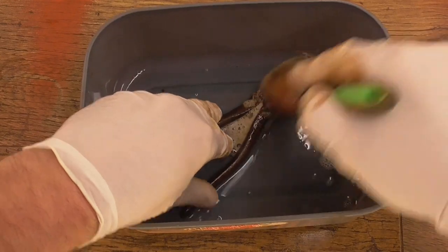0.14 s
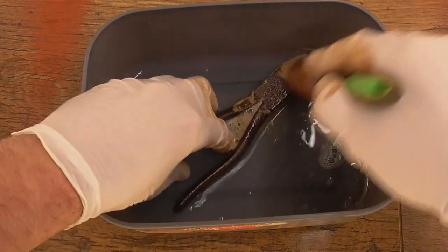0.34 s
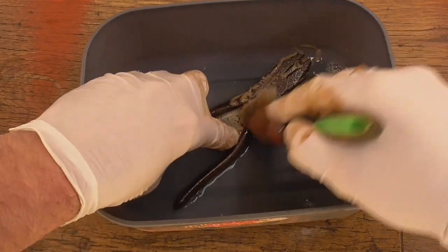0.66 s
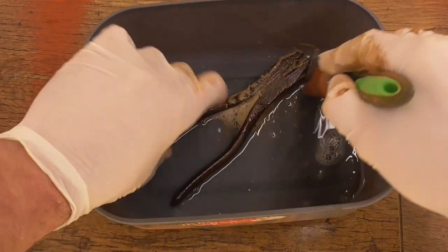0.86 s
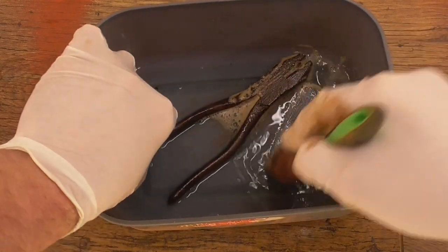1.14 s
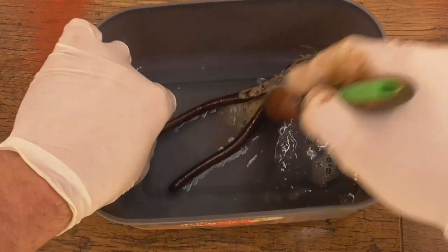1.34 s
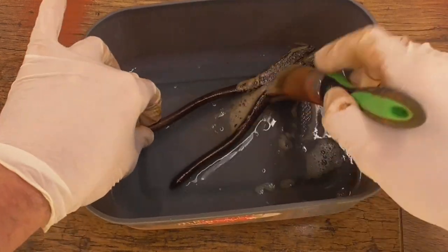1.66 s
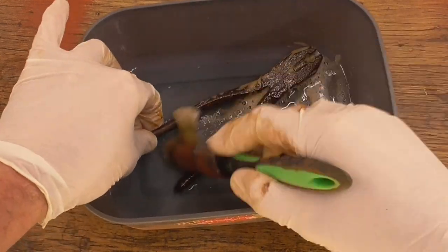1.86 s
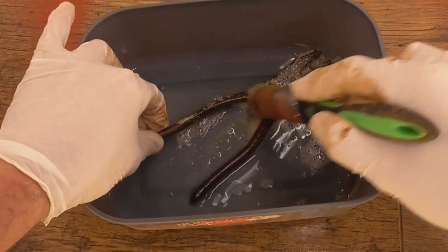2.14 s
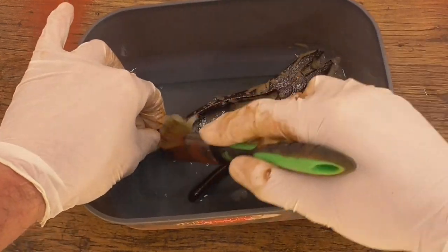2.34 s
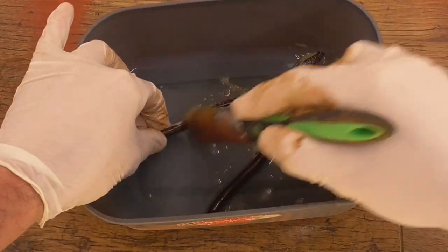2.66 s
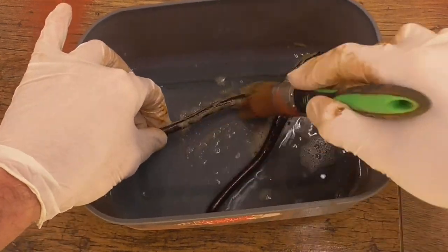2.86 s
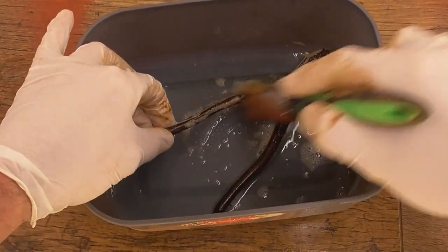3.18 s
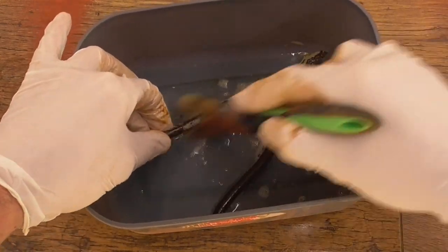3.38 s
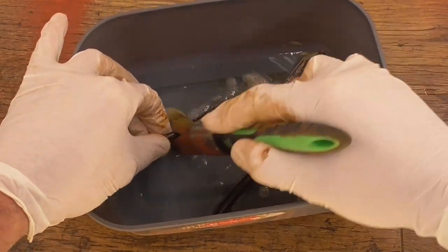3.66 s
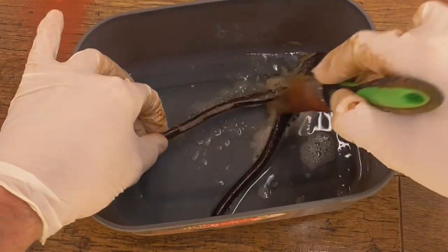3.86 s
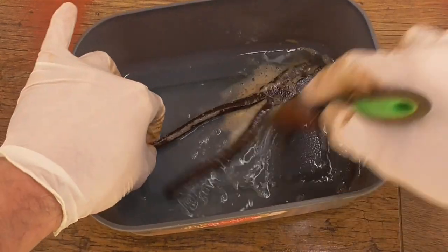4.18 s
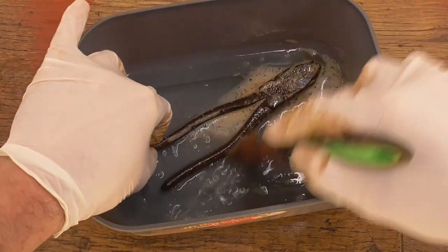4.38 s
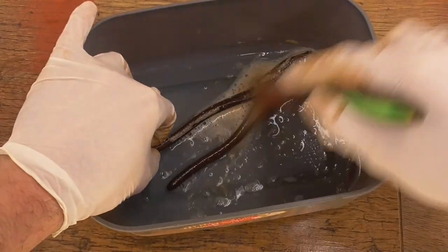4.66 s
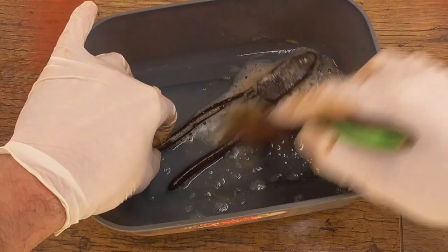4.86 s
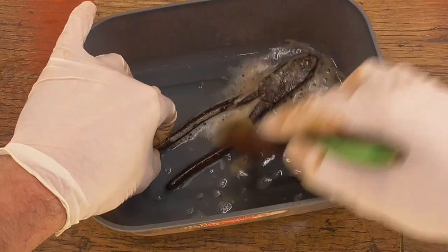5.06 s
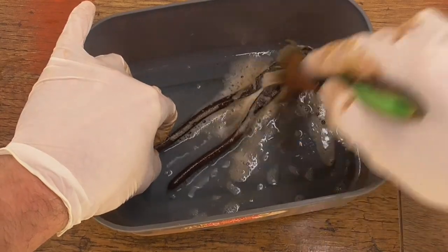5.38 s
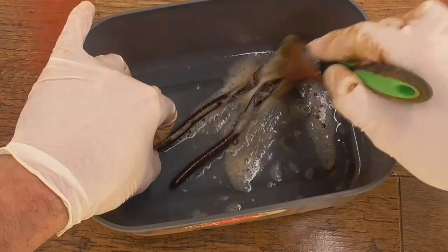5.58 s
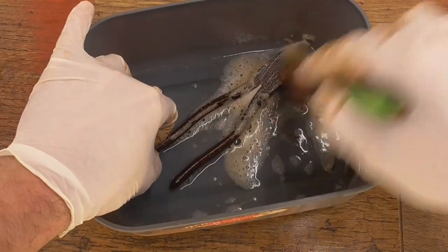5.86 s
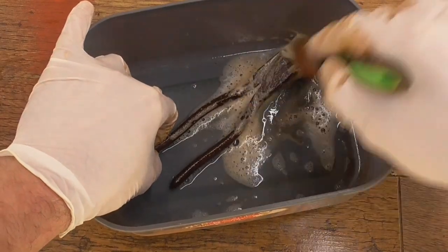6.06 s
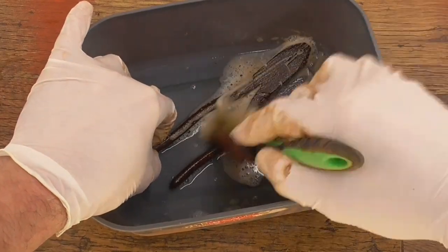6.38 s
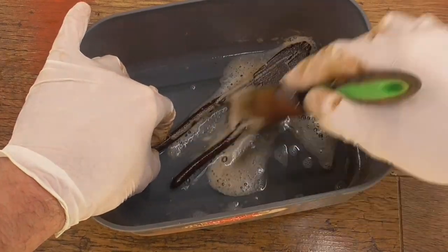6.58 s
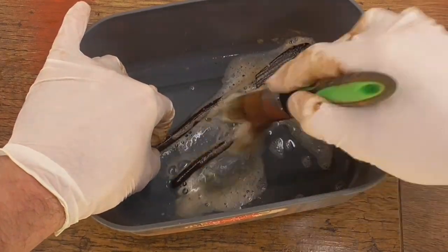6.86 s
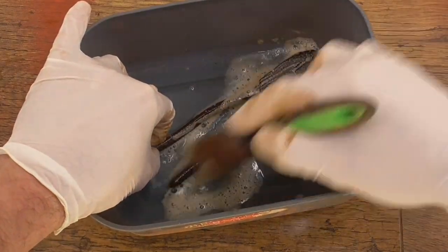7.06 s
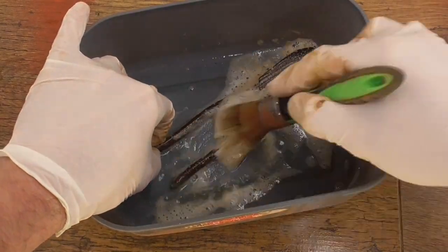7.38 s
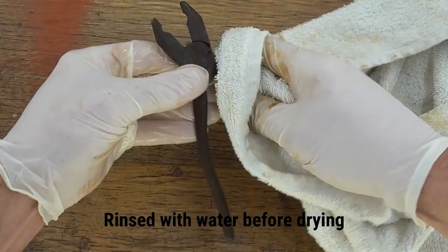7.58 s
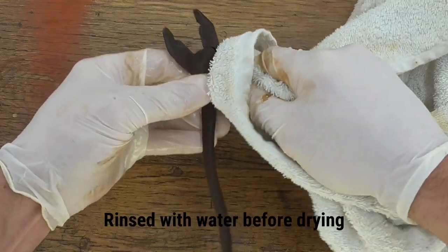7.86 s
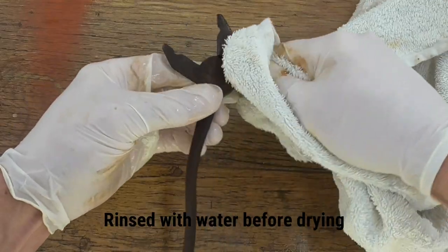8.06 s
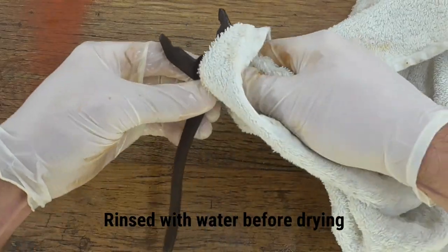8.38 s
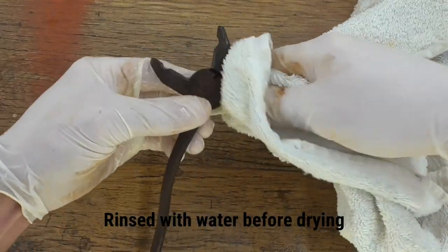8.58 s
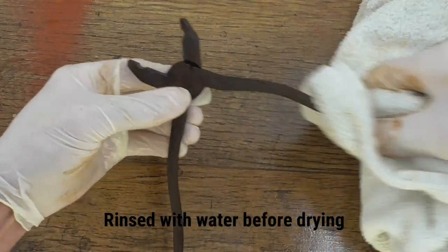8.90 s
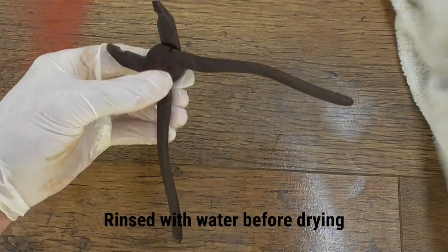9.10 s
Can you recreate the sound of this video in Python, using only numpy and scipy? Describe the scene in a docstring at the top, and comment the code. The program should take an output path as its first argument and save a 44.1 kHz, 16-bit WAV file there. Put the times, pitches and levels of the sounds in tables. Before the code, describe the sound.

Wet, scratchy brush strokes come about eight a second on steel and plastic, with brief lulls early on, then a denser, louder run. Liquid laps, small bubbles plip, and the tub answers irregular bumps with short boxy thumps. Near the end the sound cuts to much softer cloth sliding over metal, with small clicks. A close stereo pair in a small room picks up low rumble and very faint hum.

```python
"""A small stiff brush scrubs rusty pliers in a shallow film of liquid, in a plastic tub on a wooden top.
Each stroke is a swarm of random bristle flicks: wet hiss and spray, a rasp on the steel, a scrape through the tub.
The pliers knock on the tub floor, built from decaying modes and noise bursts; liquid laps and small bubbles ring.
Then the scene changes abruptly: a towel of sliding noise rubs the pliers dry, with small clicks of the steel.
A small room answers both scenes, over low rumble and faint hum, before a close left and right microphone pair."""
import sys
import numpy as np
from scipy import signal
from scipy.fft import rfft, irfft, next_fast_len
from scipy.io import wavfile

SR = 44100
rng = np.random.default_rng(int(sys.argv[2]) if len(sys.argv) > 2 else 0)


def persist_wave(psi):
    """Save psi, clipped to +-1, as 16-bit WAV."""
    counts = np.round(np.clip(psi, -1, 1) * 32767).astype(np.int16)
    wavfile.write(sys.argv[1], SR, np.atleast_2d(counts).T)


N = 407027
TIME = np.arange(N) / SR

# brush strokes, to and fro: fastest_s, length_s, wet_hiss_db
STROKES = [(0.013, 0.037, -62), (0.093, 0.083, -61), (0.199, 0.08, -56.5), (0.297, 0.096, -59),
           (0.413, 0.06, -51), (0.52, 0.13, -60.5), (0.635, 0.1, -57), (0.743, .07, -59.5),
           (0.868, 0.11, -55.5), (1.065, 0.046, -68), (1.194, 0.29, -71), (1.45, .015, -64.5),
           (1.477, 0.047, -65), (1.564, 0.12, -61), (1.727, 0.14, -60.5), (1.958, 0.16, -60.5),
           (2.164, 0.14, -60), (2.309, .04, -62.5), (2.435, 0.11, -65.5), (2.586, 0.098, -54),
           (2.726, 0.044, -69.5), (2.834, 0.045, -64.5), (2.928, 0.085, -52), (3.076, 0.13, -64),
           (3.201, 0.074, -54.5), (3.361, 0.16, -56.5), (3.547, 0.094, -48.5), (3.722, 0.095, -52.5),
           (3.882, 0.092, -48), (3.99, 0.13, -65.5), (4.127, 0.027, -64), (4.227, 0.13, -64),
           (4.323, 0.072, -53.5), (4.452, 0.11, -60.5), (4.561, 0.064, -52), (4.685, 0.12, -58.5),
           (4.803, 0.061, -52.5), (4.91, 0.059, -55.5), (5.023, 0.095, -55.5), (5.139, 0.056, -51.5),
           (5.241, 0.075, -53.5), (5.354, 0.07, -55.5), (5.455, 0.063, -53.5), (5.564, 0.11, -58.5),
           (5.694, 0.096, -55), (5.809, 0.077, -57.5), (5.92, .065, -53), (6.021, 0.11, -59),
           (6.144, 0.07, -54), (6.234, 0.086, -59.5), (6.363, 0.077, -55.5), (6.433, .05, -60),
           (6.499, 0.091, -57.5), (6.708, 0.086, -59), (6.793, 0.048, -61.5), (6.843, 0.08, -52),
           (6.972, 0.036, -52.5), (7.082, 0.084, -53), (7.222, 0.069, -56), (7.339, .08, -53.5),
           (7.47, 0.069, -55.5), (7.607, 0.076, -57)]
# colour of bristles or cloth rasping on steel: frequency_hz, level_db_per_hz
RASP = [(1300, -13.5), (2000, -5), (2900, -3.5), (3600, 4), (4300, 2), (5000, -1.5), (5800, -11.5),
        (8000, -32)]
# colour of the scrape through the tub, also of rustling cloth folds: frequency_hz, level_db_per_hz
SCRAPE = [(150, -38), (380, 4.5), (520, -1.5), (680, 9.5), (1000, 4.5), (1400, 6.5), (1850, -6.5),
          (2300, -4), (2900, -18.5), (4500, -23)]
# colour of a small steel click: frequency_hz, level_db_per_hz
CLICK = [(900, -10), (1500, 8), (2000, -16), (3000, 1), (4500, 2), (6500, -5.5), (14000, -16)]

SCRAPE_LAG_S = 0.011  # the drag on the tub follows the first hiss of the tips


def brush():
    """Bristles flick through the wet film and over the rust; their tugs on the pliers sound through the tub."""
    # colour of the wet hiss: frequency_hz, level_db_per_hz
    hiss_colour = [(900, -15), (1500, -7.5), (2150, -5.5), (2900, -13.5), (5500, -6.5), (7000, -2),
                   (8500, -1.5), (10300, 1.5), (12000, -7), (13500, -11), (15700, -31)]
    # colour of the spray: frequency_hz, level_db_per_hz
    mist_colour = [(8000, -28), (11000, -2), (12700, -2.5), (14000, -7), (15700, -14.5)]
    # fine spray from the tips, weaker once the brush works on the handle: time_s, level_db (before lift and speed)
    spray_curve = [(0, -5.5), (2.2, -6.5), (3.6, -8), (4.5, -7), (5.8, -8), (6.7, -9), (7.6, -11)]
    rise_share = 0.54  # part of a stroke spent speeding up
    rasp_lag_s = 0.0042  # the tips hiss first, then the bent bristles rasp and drag
    spray_lift_db = 8

    times, lengths, hiss_db = np.transpose(STROKES)
    rasp_db, scrape_db = stroke_levels()
    hiss = swell(times, lengths, hiss_db, rise_share)
    rasp = swell(times + rasp_lag_s, lengths, rasp_db, rise_share)
    scrape = swell(times + SCRAPE_LAG_S, 1.17 * lengths, scrape_db, rise_share)
    snags = catches(rate=90, t60=0.037)

    speed = hiss / hiss.max()
    spray_db = np.interp(TIME, *np.transpose(spray_curve)) + spray_lift_db
    spray = undb(spray_db) * speed ** 0.22  # fast strokes throw the finest drops
    film = undb(0.1) * colour(flicks(22000, 0.79), hiss_colour)
    film = film + spray * colour(flicks(16000, 1.0), mist_colour)

    wet = hiss * unit(1 + 0.5 * snags) * film
    steel = rasp * unit(1 + 0.087 * snags) * colour(flicks(8000, 0.47), RASP)
    tub = scrape * unit(1 + 0.5 * snags) * colour(flicks(3000, 1.0), SCRAPE)
    return wet + steel + tub


def stroke_levels():
    """Rasp and scrape of each stroke in dB: both grow with its vigour and with the pressure on the brush."""
    # how hard the brush bears down on pliers and tub: time_s, pressure_db
    pressure_curve = [(0, 3.5), (0.42, -6), (0.62, -0.5), (1.2, -1), (1.7, 4), (1.97, -5), (2.4, -10.5),
                      (2.62, 1), (3.1, -3.5), (3.55, -3), (3.9, -2), (4.5, -7), (4.8, 0.5), (5.15, 2),
                      (6.05, -2), (6.5, 1.5), (6.85, 4.5), (7.6, 3.5)]
    usual_hiss_db = -54.5  # an average stroke
    times, _, hiss_db = np.transpose(STROKES)
    vigour = hiss_db - usual_hiss_db
    pressure = np.interp(times, *np.transpose(pressure_curve))
    rasp_db = -57 + vigour + 0.63 * pressure
    scrape_db = -57 + 0.68 * vigour + pressure  # grows more slowly than the hiss
    return rasp_db, scrape_db


def swell(times, lengths, levels, rise_share):
    """Level curve of strokes that speed up, hold and slow down again."""
    steepness = 5.4  # how quickly the sound dies as the hand turns round
    flatness = 2.29  # how level it holds before
    coarse = TIME[::32]
    lag = coarse - times[:, None]
    reach = lengths[:, None] * np.where(lag < 0, rise_share, 1 - rise_share)
    away = np.abs(lag / reach)
    slowing = (1 + away ** flatness) ** (1 / flatness) - 1
    power = undb(levels)[:, None] ** 2 * np.exp(-steepness * slowing)
    return np.interp(TIME, coarse, np.sqrt(power.sum(0)))


def catches(rate, t60):
    """Tufts snag at random and spring free: sudden jumps of level that die away."""
    jumps = (rng.random(N) < rate / SR) * rng.standard_exponential(N)
    pole = np.exp(-np.log(1000) / (t60 * SR))
    return signal.lfilter([1], [1, -pole], np.minimum(jumps, 2))


def flicks(rate, spread_db):
    """Random tiny clicks, so many a second, a few much larger than the rest."""
    happens = rng.random(N) < rate / SR
    size = undb(spread_db * np.minimum(rng.standard_exponential(N), 5))
    return happens * size * rng.standard_normal((2, N))


def knocks():
    """The clear knocks, and faint ones where a stroke happens to nudge the pliers; stronger blows thud more."""
    # pliers and brush head knocking on the tub: start_s, knock_gain_db, floor_boom_gain_db, hard_clack_gain_db
    clear_knocks = [(0.1619, -47.5, 16.5, -5), (0.3188, -56.5, 11.5, 0), (0.451, -63, 21.5, -1),
                    (0.505, -60.5, 18.5, -14), (0.528, -50, 6, 1), (0.62, -60, 13, 11),
                    (0.895, -57.5, 11.5, -12), (0.926, -55.5, -14, -17), (1.1783, -54.5, -2, -2.5),
                    (1.472, -60.5, 13, 5), (1.5434, -50.5, -3, 1.5), (1.7431, -36.5, 5, -21),
                    (2.185, -48.5, -15, -4), (2.2606, -64, 13, -15), (2.6182, -56, 5, 8.5),
                    (2.6447, -52.5, -8, 0), (2.6913, -52, -10, 0.5), (2.976, -47, 7.5, 1),
                    (3.599, -57, -1, 7.5), (4.031, -54, 13, 0), (4.123, -47, 0, -1), (4.146, -47.5, 9, -15),
                    (4.269, -54, 13.5, 5), (4.3301, -47.5, -5, -1), (4.778, -59, -4, 12),
                    (4.7965, -45, 7.5, 0), (5.0255, -32.5, 4, -9), (5.286, -42, 4.5, -4),
                    (5.305, -42.5, 7.5, -25), (5.357, -49.5, -17, -7), (5.431, -58, 1, 6),
                    (5.488, -59.5, 11, 3), (5.5611, -51.5, 4, -5), (5.707, -30, 3, -9),
                    (5.732, -43.5, -17, 1.5), (5.8645, -49.5, 14, -7), (6.372, -58, 12, -17),
                    (6.6857, -47, 8.5, -9), (6.9607, -47.5, -5, -20), (6.983, -49, 6, 7),
                    (6.9965, -38, 6, -6), (7.245, -39.5, 5.5, 6.5), (7.4886, -41.5, 9, 9)]
    nudge_share, nudge_db, nudge_scatter_db = 0.2, -6, 3  # share of strokes; gain relative to their scrape
    firm_knock_db, firm_thud_db, thud_growth = -35, -67.5, 0.19  # wooden top, and dB per dB of the knock
    rocking_start_s, rocking_end_s, rocking_thud_db = 4.1, 5.6, 7  # here the whole tub rocks and thuds more
    thud_per_clack = 0.35  # dB less thud per dB of clack: sharp contacts hardly move the whole tub

    nudges = []
    for (s, length, _), scrape_db in zip(STROKES, stroke_levels()[1]):
        late, size, boom = rng.standard_normal(3)
        if rng.random() < nudge_share:
            nudge_gain_db = scrape_db + nudge_db + nudge_scatter_db * size
            nudges.append((s + length * late / 4, nudge_gain_db, 5 + 3 * boom, 0))

    out = np.zeros((2, N))
    for s, db, boom_db, clack_db in list(clear_knocks) + nudges:
        rocking = rocking_start_s < s < rocking_end_s
        thud_db = firm_thud_db + thud_growth * (db - firm_knock_db)
        thud_db += rocking_thud_db * rocking - thud_per_clack * max(clack_db, 0)
        add(out, s, knock(db, boom_db, clack_db, thud_db))
    return out


def knock(db, boom_db, clack_db, thud_db):
    """A blow rings walls and floor of the tub and thuds into the wood; hard contacts add a clack."""
    # tub modes, wet floor first, then walls, then those only a hard contact reaches: frequency_hz, level_db, t60_s
    tub_modes = np.array([(213.7, -5.5, 0.05), (291, 0, 0.062), (312.7, -1, 0.074), (395, -2, 0.048),
                          (400.7, -3, 0.15), (444, -7.5, 0.15), (542.4, -7, 0.14), (600.2, -1, 0.22),
                          (650, 4, 0.099), (709, -3, 0.13), (797, -6.5, 0.17), (895, -8.5, 0.098),
                          (933, -3.5, 0.41), (1017, 4, 0.3), (1040, -13, 0.055), (1226, 9.5, 0.051),
                          (1370, -16, 0.033), (1460, -23, 0.098), (1630, -6, 0.21)])
    # modes of the wooden top: frequency_hz, level_db, t60_s
    top_modes = [(64.7, 17.5, 0.35), (83.6, -13, 0.23), (92.4, 8, 0.93)]
    # colour of the dull thump in the tub: frequency_hz, level_db_per_hz
    thump_colour = [(50, -30), (130, -56), (190, 3.5), (240, 2), (330, -27), (420, 10.5), (530, -3.5),
                    (700, -2.5), (900, -0.5), (1400, -21), (2500, -44)]
    # colour of the crack of a hard contact: frequency_hz, level_db_per_hz
    crack_colour = [(500, -14), (1000, -3.5), (1500, -5), (1850, -16.5), (2400, -11.5), (2900, -22),
                    (4300, -17), (5500, -36), (10000, -29), (15000, -60)]

    t = TIME[:SR // 3]
    floor = ring(tub_modes[:4], detune=0.032, bloom_s=0.0062, width=0.054)
    walls = ring(tub_modes[4:12], detune=0.0078, bloom_s=0.0035, width=0.11)
    clack = ring(tub_modes[12:], detune=0.013, bloom_s=0.00049, width=0.14)
    thud = ring(top_modes, detune=0.03, bloom_s=0.0034, width=0.072)

    # the tub floor bows under the pliers and swings back
    swing = np.zeros(len(t))
    for hz in (303, 636):
        swing += np.sin(2 * np.pi * hz * (1 + 0.041 * rng.standard_normal()) * t)
    bow = blow(swing[None] * decay(t, 0.031) * (1 - np.exp(-t / 0.0047)))
    softness = 1 / (1 + undb(clack_db))

    body = undb(-3) * walls + undb(-10.5) * burst(thump_colour, t60=0.16)
    body = body + softness * undb(-6) * bow
    contact = undb(-10) * clack + undb(-6.5) * burst(crack_colour, t60=0.18)
    contact = contact + undb(-25.5) * burst(CLICK, t60=0.018)
    tub = body + undb(boom_db - 13.5) * floor + undb(clack_db) * contact
    # the first swings are the strongest, before liquid and pliers damp the plastic
    punch = 0.61 + 0.77 * np.exp(-t / 0.0072)
    return undb(db) * punch * tub + undb(thud_db) * thud


def ring(modes, detune, bloom_s, width):
    """Decaying modes; the place of each blow changes their strength and sign; bending waves take time to spread."""
    t = TIME[:SR // 3]
    hz, db, t60 = np.transpose(modes)[:, :, None]
    size, shift, sign, place = rng.standard_normal((4, len(modes), 1))
    waves = np.sin(2 * np.pi * hz * (1 + detune * shift) * t) * decay(t, t60)
    waves = waves * np.sign(sign) * undb(db + 1.35 * size)
    mid = waves.sum(0)
    side = width * (place * waves).sum(0)
    bloom = 1 - np.exp(-t / bloom_s)
    return blow(np.array([mid + side, mid - side]) * bloom)


def burst(points, t60):
    """A dense mass of short-lived resonances, made as decaying coloured noise."""
    t = TIME[:SR // 3]
    noise = rng.standard_normal((2, len(t)))
    return blow(colour(noise, points) * decay(t, t60))


def liquid():
    """The stirred liquid laps in the tub as slowly wavering coloured clicks, and bubbles ring in it."""
    # colour of the lapping: frequency_hz, level_db_per_hz
    slosh_colour = [(35, -16), (65, -4), (125, -14.5), (230, -10), (400, 0), (520, -3), (720, -0.5),
                    (1200, -12.5), (2000, -24), (5000, -30.5)]
    laps = colour(flicks(1500, 1.3), slosh_colour)
    return undb(-64.5 + 3.0 * walk(22)) * laps + bubbles(count=5)


def bubbles(count):
    """Each stroke whips up a few bubbles that ring briefly and rise in pitch."""
    middle_hz, spread_octaves = 1180, 0.55
    fade_cycles, glide = 4.9, 0.022  # cycles to fade to 1/e; share of pitch gained in that time
    level_db, scatter_db = -2.5, 2.5  # relative to the scrape of the stroke
    out, t = np.zeros((2, N)), TIME[:SR // 20]
    for (s, length, _), scrape_db in zip(STROKES, stroke_levels()[1]):
        for late, size, strength, place in np.clip(rng.standard_normal((count, 4)), -2, 2):
            cycles = middle_hz * 2 ** (spread_octaves * size) * t
            age = cycles / fade_cycles
            plip = np.sin(2 * np.pi * cycles * (1 + glide * age / 2)) * np.exp(-age)
            pan_db = np.array([[place], [-place]])
            db = scrape_db + level_db + scatter_db * strength + pan_db
            add(out, s + SCRAPE_LAG_S + late * length / 2, undb(db) * plip)
    return out


def towel():
    """Cloth loops slide over the steel and the rubber gloves; the pliers click as they are turned."""
    # towel wipes: fastest_s, length_s, fibre_hiss_db
    wipes = [(7.817, 0.12, -75), (7.94, 0.044, -69), (8.117, 0.042, -64.5), (8.323, .11, -74),
             (8.5, 0.53, -76.5), (8.715, 0.15, -71.5), (8.995, 0.22, -65)]
    # small clicks of the pliers in the gloved hand: start_s, level_db
    hand_clicks = [(7.829, -70.5), (7.907, -71.5), (8.621, -80), (8.808, -83), (9.196, -82)]
    # colour of sliding cloth: frequency_hz, level_db_per_hz
    cloth_colour = [(3000, -12), (5500, -7.5), (7000, -4.5), (9500, -2), (12500, -5), (14000, -10),
                    (15700, -22)]
    wiping = swell(*np.transpose(wipes), rise_share=0.69)
    fibres = colour(flicks(10000, 1.1), cloth_colour)
    steel = undb(-6.5) * colour(flicks(5000, 1.5), RASP)
    folds = undb(-6) * colour(flicks(2000, 1.2), SCRAPE)
    snags = catches(rate=96, t60=0.045)
    out = wiping * unit(1 + 0.27 * snags) * (fibres + steel + folds)
    for s, db in hand_clicks:
        add(out, s, undb(db) * burst(CLICK, t60=0.037))
    return out


def room_rumble():
    """The steady rumble of the room: coloured noise whose level wavers slightly."""
    # colour of the room tone: frequency_hz, level_db_per_hz
    tone_colour = [(25, -24), (60, 0.5), (95, -0.5), (125, -17.5), (190, -1), (300, -5), (440, 2.5),
                   (700, 0), (1150, -11.5), (1400, -10.5), (1750, -20), (3900, -21.5), (6000, -29),
                   (11000, -28), (15500, -41)]
    return undb(-66 + 0.5 * walk(15)) * colour(rng.standard_normal((2, N)), tone_colour)


def mains_hum():
    """Faint mains hum: one pure tone at 100 Hz."""
    return undb(-79) * unit(np.sin(2 * np.pi * 100 * TIME))


def room(x, t60, wet_db, near_t60, near_db):
    """Nearby surfaces scatter each sound; then the small room answers with a dull tail and its standing waves."""
    # standing waves of the room: frequency_hz, resonance_gain_db, t60_s
    standing_waves = [(198, -2, 0.22), (230, 7.5, .42), (292.6, -5, 0.18), (394.6, 3.5, 0.26),
                      (443.6, -1.5, 0.18), (630, -2.5, 0.31), (698, -16, .25), (951.4, 0, 0.16)]
    # colours of tail and near scatter: frequency_hz, level_db_per_hz
    dull = [(100, -8), (400, -2), (1500, 0), (5000, -5), (14000, -10)]
    bright = [(200, -16), (500, -8), (1200, 0), (4500, -1), (14000, -2)]
    t = TIME[:SR // 2]
    tail = colour(rng.standard_normal((2, len(t))), dull) * decay(t, t60) * (t > 0.006)
    near = colour(rng.standard_normal((2, len(t))), bright) * decay(t, near_t60) * (t > 0.001)
    echo = (undb(wet_db) * unit(tail) + undb(near_db) * unit(near)) / np.sqrt(len(t))
    for hz, db, ring_s in standing_waves:
        damping = np.log(1000) / ring_s
        echo = echo + undb(db) * 2 * damping / SR * np.exp(-damping * t) * np.cos(2 * np.pi * hz * t)
    return x + signal.fftconvolve(x, echo, axes=1)[:, :N]


def undb(db):
    """Decibels to gain."""
    return 10 ** (np.asarray(db) / 20)


def unit(x):
    """Scale to rms 1."""
    return x / np.sqrt(np.mean(x ** 2))


def blow(x):
    """Scale a struck sound to rms 1 over its first 35 ms."""
    return x / np.sqrt(np.mean(x[:, :int(0.035 * SR)] ** 2))


def decay(t, t60):
    """Exponential fade that loses 60 dB in t60 seconds."""
    return np.exp(-np.log(1000) * t / t60)


def walk(rate):
    """Slow chance with a spread near 1: random knots, so many a second, joined by straight lines."""
    knots = rng.standard_normal(4000)
    return 1.32 * np.interp(TIME * rate, np.arange(len(knots)), knots)


def read(points, n):
    """A table of (Hz, value) on the frequency axis of n samples."""
    hz, value = np.transpose(points)
    return np.interp(np.log(np.fft.rfftfreq(n, 1 / SR) + 1), np.log(hz), value)


def colour(pair, points):
    """Give two unrelated signals a spectrum and spread them as mid and side over the microphones."""
    # stereo width at the microphone pair: frequency_hz, side_minus_mid_db
    stereo_width = [(100, -12.5), (500, -8), (1000, -8), (2000, -10.5), (4000, -13), (8000, -2),
                    (12000, -7.5)]
    size = next_fast_len(pair.shape[1], True)
    mid, side = rfft(pair, size) * undb(read(points, size))
    side = side * undb(read(stereo_width, size))
    return unit(irfft(np.array([mid + side, mid - side]), size)[:, :pair.shape[1]])


def add(out, s, sound):
    """Mix a sound in at time s."""
    start = max(int(s * SR), 0)
    part = sound[:, :N - start]
    out[:, start:start + part.shape[1]] += part


def scene():
    """Scrubbing, then drying, over the steady rumble and faint mains hum of the room."""
    scene_change_s = 7.640
    scrubbing = np.clip((scene_change_s - TIME) / 0.003, 0, 1)  # 3 ms crossfade
    rumble = room_rumble()
    washing = room(brush() + knocks() + liquid() + rumble, t60=0.28, wet_db=-20.5, near_t60=0.065, near_db=-7.5)
    drying = room(towel() + rumble, t60=0.3, wet_db=-20, near_t60=0.06, near_db=-14)
    return scrubbing * washing + (1 - scrubbing) * drying + mains_hum()


def record(dry):
    """The right microphone hears more treble; the top is cut steeply."""
    # balance of the microphone pair: frequency_hz, left_minus_right_db
    tilt = [(60, 0), (110, 1.5), (200, 0.5), (380, -1.5), (700, -2), (1290, -1.0), (2380, 0), (4400, 0.0),
            (8120, 0), (15000, -8)]
    size = next_fast_len(N, True)
    gains = undb(np.array([[0.5], [-0.5]]) * read(tilt, size))
    gains = gains / np.sqrt(np.mean(gains ** 2, axis=0))  # keep the power of the pair
    heard = irfft(rfft(dry, size) * gains, size)[:, :N]
    top_cut = signal.ellip(12, 0.1, 80, 15750, fs=SR, output="sos")  # order, ripple dB, stop dB, edge Hz
    return signal.sosfilt(top_cut, heard)


dry = scene()
out = record(dry)
persist_wave(out)
```